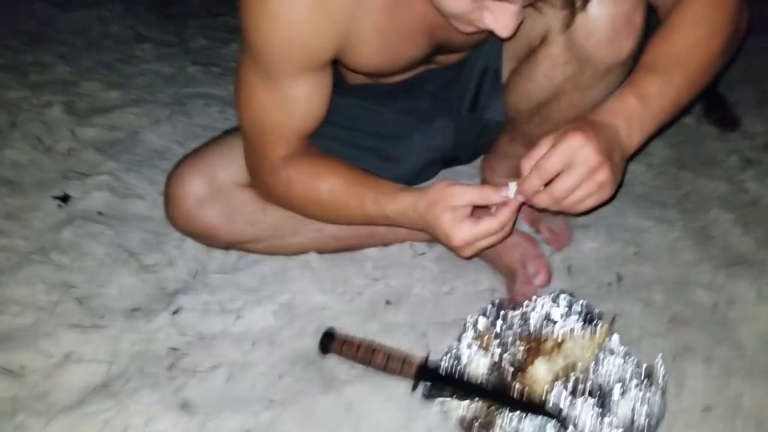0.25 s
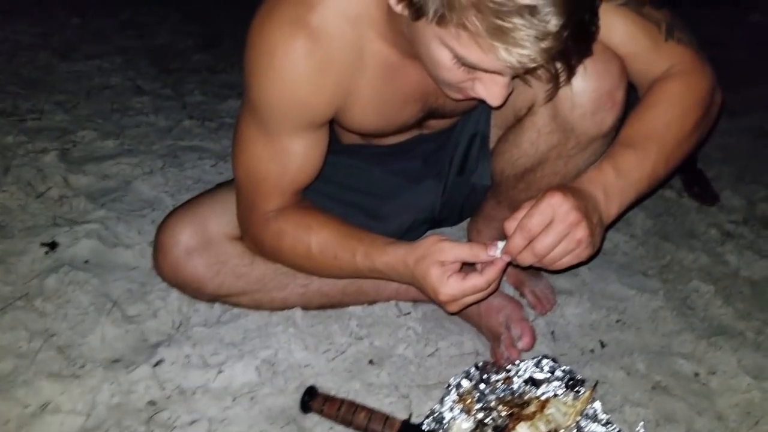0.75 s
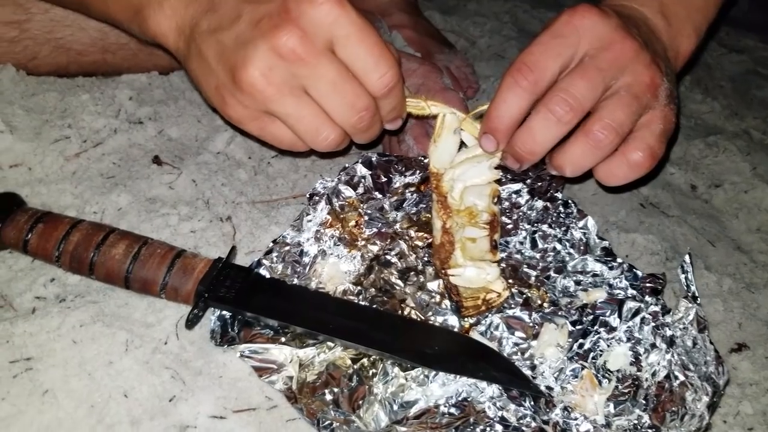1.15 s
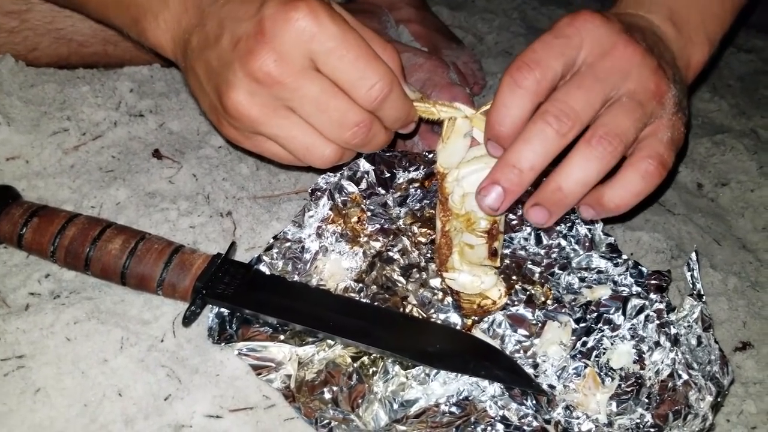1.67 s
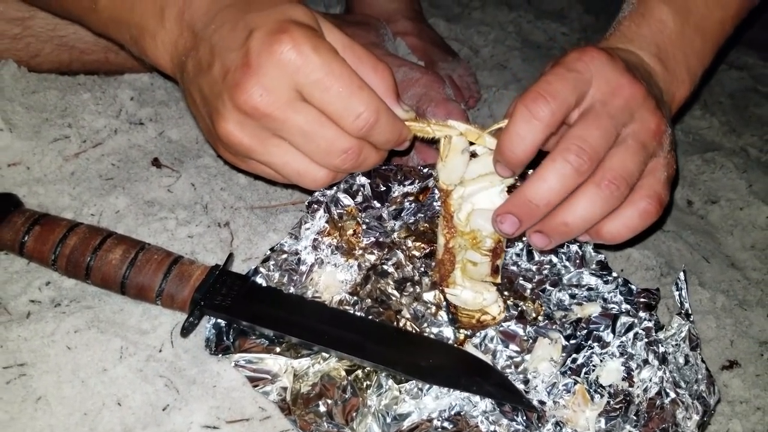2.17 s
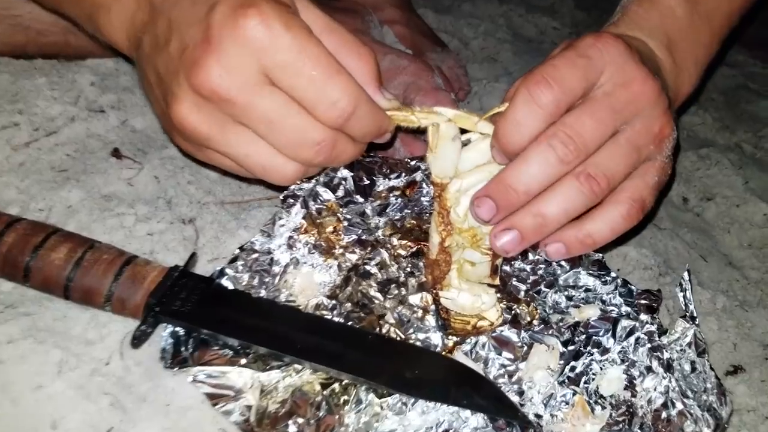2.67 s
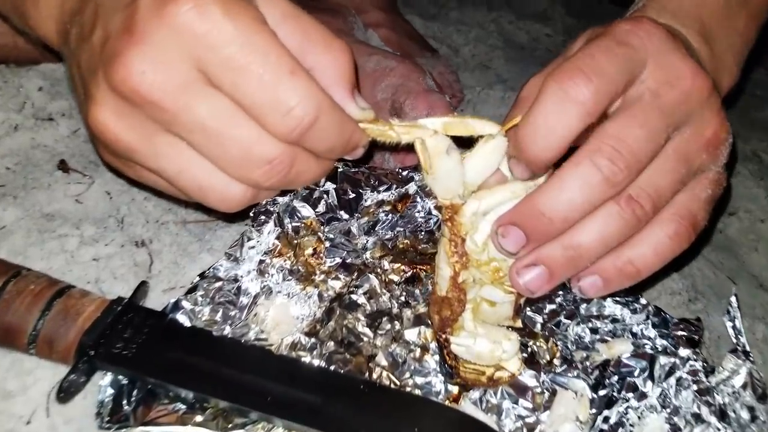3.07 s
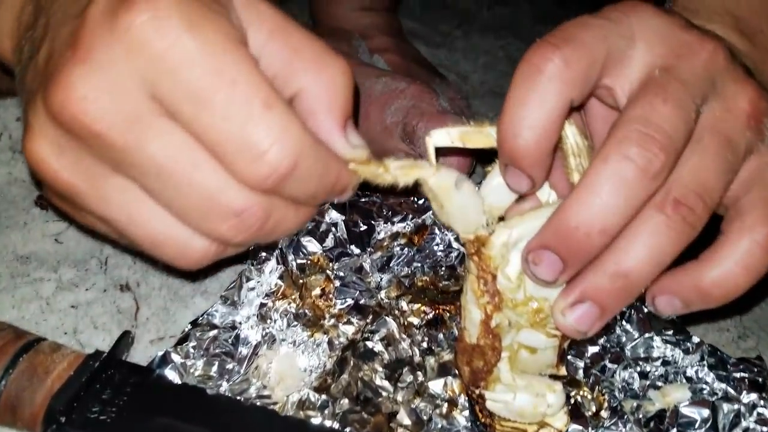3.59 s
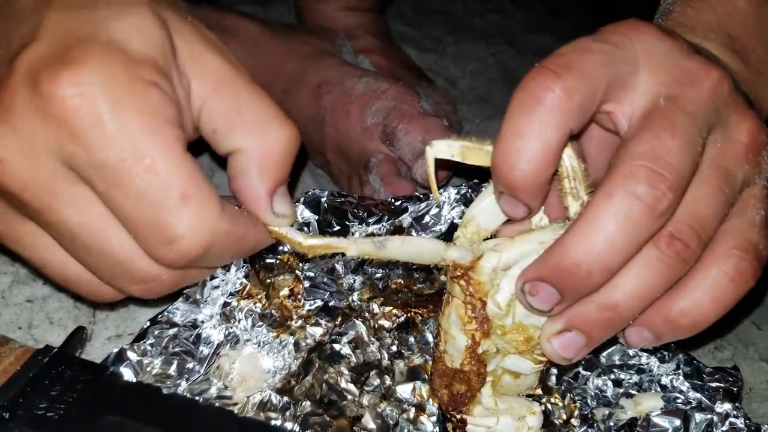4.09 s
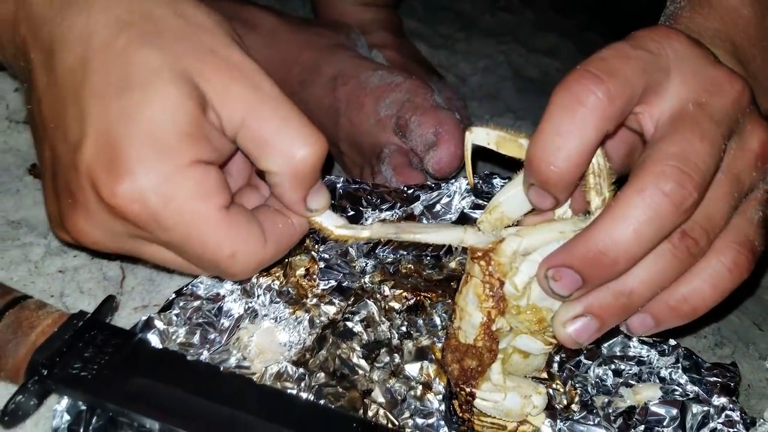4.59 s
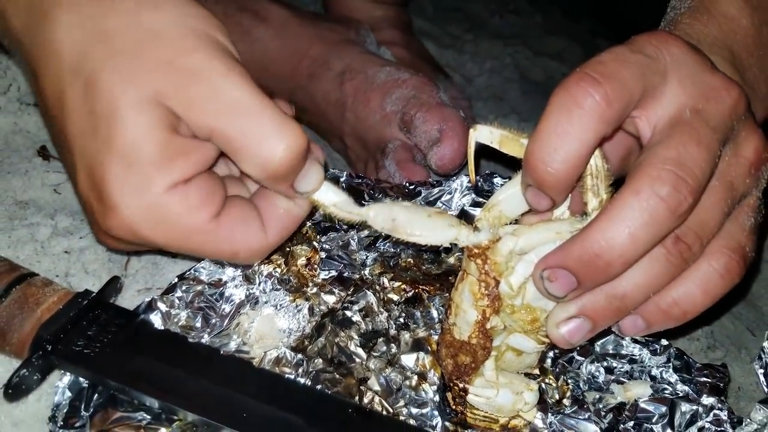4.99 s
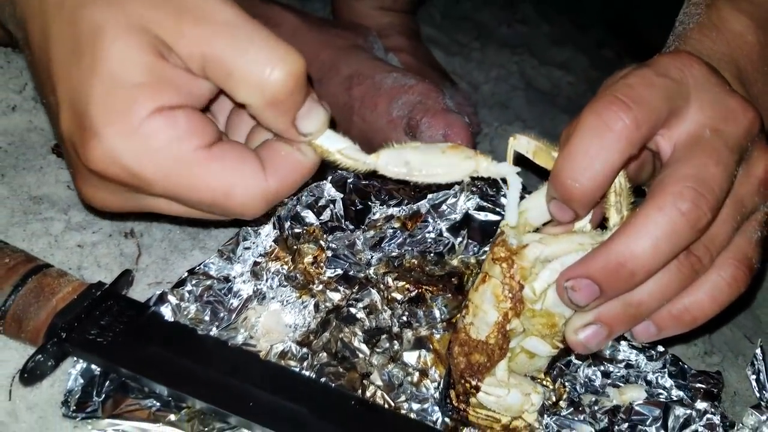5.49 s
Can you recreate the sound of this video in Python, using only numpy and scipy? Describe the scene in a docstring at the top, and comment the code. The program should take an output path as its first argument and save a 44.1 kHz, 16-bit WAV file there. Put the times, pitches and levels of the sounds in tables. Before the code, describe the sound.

Hands snap and pull apart a crab shell over crinkling foil, with faint insects, a soft breeze and distant surf behind.

```python
"""Sharp snaps and creaks of shell: hands crack a cooked crab and pull out a leg, on a beach at night.
Each break is a click with a splintery rattle, and a joint creaks as it slips in quick jerks.
Fingers rustle over crumpled aluminium foil, and juice pops in the squeezed meat.
Behind it a breeze bumps the left microphone, insects buzz and far surf rumbles."""
import sys
import numpy as np
from scipy import signal
from scipy.fft import rfft, irfft, next_fast_len
from scipy.io import wavfile
from scipy.ndimage import map_coordinates

SR = 44100
rng = np.random.default_rng(int(sys.argv[2]) if len(sys.argv) > 2 else 0)


def dump(signal):
    """Clip the signal to [-1, 1] and save it as 16-bit WAV at the path in sys.argv[1]."""
    limited = np.clip(np.atleast_2d(signal).T, -1, 1)
    pcm = np.round(limited * 32767).astype(np.int16)
    wavfile.write(sys.argv[1], SR, pcm)


N = 253388

# The notes at which the hollow shell rings: pitch_hz, width_hz, gain_db
SHELL_RINGS = [(770, 440, -4.5), (1920, 650, 1.5), (2600, 440, 2)]
# Each snap of shell and foil: start_s, thud_db, crack_db, tick_db (levels in all tables are relative)
SNAPS = [(1.021, -52, -43, -30.5), (1.0355, -48, -34.5, -32), (1.0745, -62, -40, -30.5),
         (1.1508, -80, -58, -30.5), (1.198, -65, -44, -39), (1.2629, -74, -40.5, -33.5),
         (1.3651, -41.5, -22, -20), (1.408, -54, -42, -35), (1.439, -72, -43, -32),
         (1.463, -76, -45.5, -28), (1.524, -69, -41, -57), (1.6144, -78, -56, -32),
         (1.738, -56, -35.5, -43), (2.088, -59, -46.5, -58), (2.1846, -66, -49, -39),
         (2.4646, -79, -67, -38), (2.77, -70, -41, -42), (2.852, -70, -44, -40), (2.8785, -67, -37.5, -32),
         (2.8919, -44.5, -34, -33), (2.8985, -49, -38, -29), (2.92, -67, -38, -44), (2.9352, -44, -38, -30),
         (2.941, -41, -26, -20.5), (2.9447, -46, -31.5, -31), (3.0447, -48, -39, -36),
         (3.0702, -51, -41, -31.5), (3.0916, -47.5, -39.5, -32.5), (3.107, -48, -43, -36),
         (3.1328, -66, -42, -39), (3.352, -75, -45, -30), (3.4453, -79, -41.5, -37.5),
         (3.4891, -43, -18.5, -14.5), (3.506, -67, -36, -23.5), (3.5804, -57, -36.5, -36),
         (3.605, -42.5, -28.5, -30), (3.646, -68, -50, -31.5), (3.671, -64, -35.5, -30.5),
         (3.7168, -60, -35, -49), (3.7303, -49.5, -32.5, -33), (3.761, -46.5, -31, -32.5),
         (3.786, -48, -32, -33), (3.829, -54, -36, -31.5), (3.8355, -54, -32, -26), (3.8663, -50, -36, -44),
         (3.8707, -20.5, -21, -17.5), (3.879, -37, -33, -28), (3.891, -41, -36, -21),
         (3.8995, -42, -34.5, -30), (3.917, -40, -31, -32), (3.9453, -56, -35, -29),
         (3.9518, -53, -26.5, -28), (3.9738, -39, -26.5, -24), (3.983, -45, -30, -36),
         (3.99, -32, -27, -18), (4.003, -43, -32, -43), (4.0602, -52, -30.5, -26), (4.066, -50, -35, -22),
         (4.088, -45, -39, -37), (4.1053, -57, -53, -48), (4.1233, -56, -61, -38), (4.298, -54, -44, -34),
         (4.3104, -45.5, -31, -36), (4.331, -53, -43.5, -41), (4.356, -58, -60, -40),
         (4.5625, -72, -48.5, -37), (4.8098, -50.5, -45.5, -50), (4.945, -71, -48, -43),
         (4.979, -79, -64, -40), (5.0075, -44, -32.5, -20.5), (5.108, -67, -40, -36),
         (5.1256, -56, -39, -26), (5.128, -55, -44, -26), (5.143, -36, -17.5, -13.5),
         (5.1589, -22.5, -45, -41), (5.173, -36, -28.5, -29), (5.1975, -37, -33, -25.5),
         (5.2099, -41, -31, -45), (5.4842, -71, -48, -59), (5.5387, -51.5, -40.5, -44),
         (5.685, -53, -37.5, -54)]


def snaps(fracture_kick=4.8, rattle_s=0.021, echo_s=0.0026, echo_db=-9.5):
    """A break clicks, then rattles: the hollow body thuds, the shell cracks and the foil ticks."""
    layers, t = np.zeros((3, 2, N + SR)), np.arange(SR // 20) / SR
    for start_s, thud_db, crack_db, tick_db in SNAPS:
        splinters = amp(5 * np.repeat(rng.standard_normal(len(t) // 30 + 1), 30)[:len(t)])
        fade_s = rattle_s * amp(2.2 * rng.standard_normal())  # time to fall by 60 dB
        click = amp(-60 * t / 0.0011)
        rattle = splinters * amp(-8 - 60 * t / fade_s)
        shared, own = rng.standard_normal(len(t)), rng.standard_normal((2, len(t)))
        shared[0] = fracture_kick  # the fracture itself is one hard step
        at = slice(round(start_s * SR), round(start_s * SR) + len(t))
        place_db = rng.normal(0, 2.5)
        levels_db = (thud_db + 24, crack_db + 19.5, tick_db + 19.5)
        # low sounds reach both microphones more alike; the left faces the hands and hears more treble
        for layer, db, alike, pan_db in zip(layers, levels_db, (1.6, .6, .1), (2.5, 1.5, 5)):
            burst = (click + rattle) * (alike * shared + own)
            burst /= np.linalg.norm(burst, axis=1, keepdims=True)
            layer[:, at] += amp(db) * pan_left(pan_db + place_db) * burst
    ground_echo = amp(echo_db) * np.roll(layers, round(echo_s * SR), axis=2)  # off the foil below
    thud, crack, tick = (layers + ground_echo)[..., :N]
    crack_ring = resonate(crack, [(5370, 167, -11), (7780, 133, -4.5)])
    crack = band(band(crack, 2800, 9550), 3260, 8360)
    tick = band(band(tick, 11500, 15100), 6100, 14600)
    return resonate(thud, SHELL_RINGS) + crack + crack_ring + tick


# Fingers dragging over foil and shell:
# start_s, length_s, level_db, low_offset_db, treble_offset_db, crackly_share (0 to 1)
FINGER_STROKES = [(1.008, 0.02, -53, -7, -2, 0.66), (1.07, 0.23, -76, -9, 8.5, 0.6),
                  (1.33, 0.19, -67.5, -8, 7, 0.7), (1.59, 0.17, -71.5, -7, 5.5, 1),
                  (1.917, 0.086, -70, -28, -3.5, 0.7), (2.13, 1, -90.5, -6, 13, 0.97),
                  (2.655, 0.14, -65.5, -13.5, 3, 0.85), (2.786, 0.21, -65.5, -12.5, 5, 0.94),
                  (2.941, 0.2, -63.5, -6, -2.5, 0.54), (3.152, 0.27, -73, -1, 3.5, 0.7),
                  (3.455, 0.33, -61.5, -14, 2, 0.9), (3.768, 0.25, -55, -13, 3.5, 1),
                  (3.915, 0.13, -59, -15, 2, 0.8), (4.022, 0.084, -59, -29, 0.5, 1),
                  (4.269, 0.084, -59, -20, -3, 1), (4.553, 0.043, -79.5, -22, 11, 1),
                  (4.665, 0.11, -59.5, -7.5, -0.5, 0.26), (4.829, 0.06, -58, -5, -1.5, 0.6),
                  (4.951, 0.11, -69.5, -24, 2, 1), (5.105, 0.092, -51, -15.5, -3, 0.74),
                  (5.483, 0.13, -72.5, -13, -1.5, 1), (5.639, .1, -65.5, -11.5, 0.5, 1)]


def finger_strokes(rise_s=0.034, fade_db_per_s=256):
    """Each drag rises, holds and fades. Gives its smooth and crackly power in low, middle and treble."""
    t, power = np.arange(N) / SR, np.zeros((2, 3, N))
    for start_s, length_s, db, low_db, treble_db, crackly_share in FINGER_STROKES:
        rise = np.clip((t - start_s) / rise_s, 0, 1)
        fade = amp(-fade_db_per_s * np.maximum(t - start_s - length_s, 0))
        gains = amp(db + np.array([[low_db], [0], [treble_db]]))
        power += np.reshape([1 - crackly_share, crackly_share], (2, 1, 1)) * (gains * rise * fade) ** 2
    return power


# The tone of rustling foil: pitch_hz, level_db
FOIL_TONE = [(1400, -10), (2000, -2), (4500, 0.5), (7400, -0.5), (9000, -11.5), (11000, -47)]
# The faint, even hush of the night: time_s, level_db, low_offset_db, treble_offset_db
NIGHT_HUSH = [(0, -76, 6.5, -6.5), (.75, -76, 7, -4.5), (1, -78, 0.5, -7.5), (2.3, -77, -3, -1.5),
              (3.3, -81, -2.5, -3), (4.5, -78.5, -7.5, 1), (5.75, -76.5, -11, -3.5)]


def foil_rustle():
    """Rubbed foil hisses and gives off tiny, uneven crinkles; between strokes only the hush is left."""
    ticks = rng.random(N) < 150 * amp(4 * wobble(20)) / SR
    sizes = amp(np.minimum(5 * rng.exponential(size=N), 14))
    fade = amp(-60 * np.arange(SR // 50) / SR / .007)
    crinkle = unit(signal.fftconvolve(ticks * sizes, fade)[:N])
    smooth, crackly = finger_strokes()
    smooth *= amp(1.6 * np.array([wobble(45) for _ in range(3)]))  # the rub catches unevenly
    hush_db, low_db, treble_db = curves(NIGHT_HUSH)
    hush = amp(hush_db + np.array([low_db, np.zeros(N), treble_db]))
    grain = [unit(steady + crinkle) for steady in (3, 1.1, .45)]  # the treble crackles most
    low, mid, high = np.sqrt(hush ** 2 + smooth + crackly * np.square(grain))
    low_tone = [(300, 1.5), (600, 0), (1200, -2), (2000, -11), (3000, -38)]
    high_tone = [(8000, -25), (9500, -2.5), (13000, 1), (15600, 3), (16100, -34), (17000, -55)]
    low = low * noise(low_tone, [(1000, 0.31)])
    mid = mid * noise(FOIL_TONE, [(2400, 0.27), (5000, 0.087)]) * pan_left(1)
    high = high * noise(high_tone, [(9000, 0.021)]) * pan_left(1.3)
    return amp(6) * (low + mid + high)


# The leg joint slipping, one list for each creak: time_s, slips_per_s, level_db
CREAKS = [
    [(.577, 139, -48), (.584, 620, -45.5), (.6, 460, -40.5), (.622, 530, -41.5), (.633, 200, -40),
     (.638, 590, -43.5), (.648, 296, -45), (.661, 100, -39)],
    [(.733, 114, -48.5), (.7455, 290, -44), (.76, 410, -69)],
]
# The notes at which the joint rings: pitch_hz, width_hz, gain_db
JOINT_RINGS = [(1260, 1300, -18.5), (3260, 490, -2), (4740, 480, 4.5), (5380, 300, -13)]


def joint_creak():
    """Each slip is a rough kick that makes the joint ring, with a thin scratch on top."""
    kicks, t = np.zeros(N), np.arange(N) / SR
    for rows in CREAKS:
        slips_per_s, level_db = curves(rows)
        creaking = (t >= rows[0][0]) & (t <= rows[-1][0])
        uneven_rate = slips_per_s * creaking * amp(2.1 * wobble(300))
        slips = np.diff(np.floor(np.cumsum(uneven_rate) / SR + .8), prepend=0)
        kicks += slips * amp(level_db + rng.standard_normal(N))
    fade = amp(-60 * np.arange(SR // 100) / SR / 0.0078)
    rough = signal.fftconvolve(kicks, fade)[:N] * rng.standard_normal((2, N))
    ring = band(resonate(kicks + 0.5 * rough, JOINT_RINGS), 1060, 4670)
    scratch = band(band(rough, 10000, 15000), 11900, 15600)
    return (amp(27) * ring + amp(-3) * scratch) * pan_left(4.6)


# Pockets of juice popping in the squeezed meat: start_s, level_db, pitch_hz
JUICE_POPS = [(3.224, -60.5, 1100), (3.246, -62, 940), (3.282, -52, 970), (3.299, -57.5, 1020),
              (3.314, -54, 710), (3.352, -60, 1130), (3.405, -57, 566), (3.462, -55, 584),
              (3.472, -56.5, 625), (3.556, -60.5, 465), (3.577, -56, 625), (5.222, -51, 766)]


def meat_squelch(small_pops=8):
    """Each pocket of juice rings for a few cycles as it pops, with smaller pops scattered around it."""
    pops, t = np.zeros(N + SR), np.arange(SR // 40) / SR
    for start_s, db, hz in JUICE_POPS:
        small = [(start_s + .016 * delay, db - 6.5 + 2.2 * size, hz * amp(2 * detune))
                 for delay, size, detune in rng.standard_normal((small_pops, 3))]
        for at_s, level_db, pitch_hz in [(start_s, db, hz)] + small:
            cycles = pitch_hz * t
            swell = cycles * np.exp(1 - cycles / 1.2)
            pops[round(at_s * SR):][:len(t)] += amp(level_db) * swell * np.sin(2 * np.pi * cycles)
    return band(pops[:N], 280, 1400) * pan_left(4)


# Single pushes of air on the left microphone: time_s, level_db, pitch_hz, width_cycles
AIR_BUMPS = [(0.049, -33, 100, 0.29), (0.064, -28, 74.6, 0.7), (0.087, -28.5, 117, 0.6),
             (0.206, -25, 68, 0.6), (0.223, -29, 99, 0.65), (0.311, -34.5, 80.5, 0.61),
             (0.342, -36, 74, 0.54), (0.548, -39, 79, 0.68), (1.031, -33, 59.3, 0.53),
             (1.069, -27.5, 118, 0.87), (1.099, -25, 65.5, 1), (1.174, -18, 73.4, 0.16),
             (1.381, -30.5, 85, 0.42), (1.491, -42.5, 91.5, 0.87), (1.573, -27.5, 87.5, 0.6)]
# The tone of the wind's rumble: pitch_hz, level_db
WIND_TONE = [(15, -8), (45, 5.5), (80, 11), (150, -7), (300, -42), (600, -74)]
# How the wind and the surf die down: time_s, wind_db, surf_db
WIND_AND_SURF = [(0, -49, -57.5), (.5, -57.5, -64), (.95, -60, -62), (1.3, -59.5, -64.5), (2.0, -60.5, -65),
                 (2.7, -66, -65), (4, -70.5, -66), (5.75, -82, -67)]


def breeze():
    """Lumpy wind and single pushes of air hit the left microphone; the right one is sheltered."""
    wind_db, _ = curves(WIND_AND_SURF)
    lumps = unit(amp(2.3 * wobble(8.2)) * noise(WIND_TONE, [(30, 0.11)]))
    pushes, t = np.zeros(N), np.arange(N) / SR
    for time_s, db, pitch_hz, width_cycles in AIR_BUMPS:
        cycles = pitch_hz * (t - time_s)
        swell = np.exp(-(cycles / width_cycles) ** 2)
        pushes -= amp(db) * swell * np.cos(2 * np.pi * cycles + rng.uniform(-0.093, 0.47))
    return lumps * amp(wind_db) * amp([[3], [-8]]) + pushes * [[1], [0]]


# The tone of the far waves: pitch_hz, level_db
SURF_TONE = [(24, -42), (40, -2.5), (151, -1), (281, -12), (377, -12), (626, -22.5), (1560, -37),
             (2000, -35), (2600, -49)]
# How alike the waves sound on the left and right: pitch_hz, likeness
SURF_LIKENESS = [(60, 1), (200, 0.94), (700, 0.28), (1290, -1.6)]


def surf():
    """Far waves rumble, with nearly the same bass at both microphones."""
    _, surf_db = curves(WIND_AND_SURF)
    return amp(surf_db + 6 + 1.2 * wobble(11)) * noise(SURF_TONE, SURF_LIKENESS) * pan_left(1.9)


# The insect chorus: time_s, level_db, lean_db (more lean favours the higher singers)
CHORUS = [(0, -58, -2.5), (1, -61.5, -5), (1.9, -64.5, -4), (2.14, -60.5, -5.5), (2.42, -59.5, 11),
          (2.6, -63.5, -9.5), (3.2, -60, 1), (4.3, -63, -0.5), (5.75, -62, 6)]
# The narrow tone of their wings: pitch_hz, level_db
WING_TONE = [(3410, -66), (5800, -11), (6500, 7.5), (7030, 15.5), (7250, 26.5), (7450, 19), (7700, -4),
             (8300, -59)]


def insects(wing_strokes_per_s=88):
    """Two groups of insects, one a little higher, buzz with a flutter at the rate of their wing strokes."""
    level_db, lean_db = curves(CHORUS)
    flutter = np.sin(2 * np.pi * np.cumsum(wing_strokes_per_s + 3 * wobble(31)) / SR)
    chorus = np.zeros((2, N))
    # lower and higher singers swell in turn, so the pitch seems to waver
    for pitch_ratio, lean_weight in ((.975, -1.35), (1.025, 0.53)):
        tone = [(hz * pitch_ratio, db) for hz, db in WING_TONE]
        swell = amp(lean_weight * lean_db / 2 + 0.67 * wobble(4.13))
        chorus += swell * noise(tone, [(7000, 0.03)])
    return amp(level_db + 2.1 * flutter) * unit(chorus) * pan_left(9.7)


def amp(db):
    """Turn decibels into a gain to multiply by."""
    return 10 ** (np.asarray(db) / 20)


def unit(x):
    """Scale a sound to an average power of 1."""
    return x / np.sqrt(np.mean(x ** 2) + 1e-20)


def pan_left(db):
    """Left and right gains that make the left side louder by db."""
    return amp([[db / 2], [-db / 2]])


def at_pitch(points, hz):
    """Read between (pitch_hz, value) points, giving each octave equal room."""
    pitches, values = np.transpose(points)
    return np.interp(np.log(hz + 1), np.log(pitches + 1), values)


def curves(rows):
    """Join timed rows with straight lines: one curve for each column after time_s."""
    times, *columns = np.transpose(rows)
    return [np.interp(np.arange(N) / SR, times, column) for column in columns]


def wobble(per_s):
    """A smooth curve through per_s random values a second."""
    return map_coordinates(rng.standard_normal(int(N * per_s / SR) + 4), [np.arange(N) * per_s / SR])


def filtered(x, response):
    """Multiply each frequency in a sound by response(hz)."""
    size = next_fast_len(N + SR // 2)
    return irfft(rfft(x, size) * response(np.fft.rfftfreq(size, 1 / SR)), size)[..., :N]


def band(x, low_hz, high_hz):
    """Keep the sound between two frequencies, fading away outside them."""
    return signal.sosfilt(signal.butter(2, [low_hz, high_hz], "band", fs=SR, output="sos"), x)


def resonate(x, rings):
    """Make a sound ring at a few (pitch_hz, width_hz, gain_db) notes."""
    def response(hz):
        return sum((-1) ** k * amp(db) * 1j * hz * width / (pitch ** 2 - hz ** 2 + 1j * hz * width)
                   for k, (pitch, width, db) in enumerate(rings))
    return filtered(x, response)


def noise(tone, likeness):
    """Stereo noise with a given tone; likeness 1 makes both sides the same, -1 or less opposite."""
    def response(hz):
        spread = np.arccos(np.clip(at_pitch(likeness, hz), -1, 1)) / 2
        return amp(at_pitch(tone, hz)) * [np.cos(spread), np.sin(spread)]
    mid, side = filtered(rng.standard_normal((2, N)), response)
    return unit(np.array([mid + side, mid - side]))


def scene():
    """The crab and foil close by, with the night beach behind them."""
    return snaps() + foil_rustle() + joint_creak() + meat_squelch() + breeze() + surf() + insects()


# The tone of the microphones' own hiss: pitch_hz, level_db
HISS_TONE = [(300, -11), (1500, 9), (5000, -3), (7500, -9), (8600, -49), (11000, 12), (15000, 23),
             (15800, 13), (16100, -13)]
TOP_HZ = 16984


def record(dry):
    """The microphones add a faint hiss, and nothing above TOP_HZ gets through."""
    hiss = amp(-79.5) * noise(HISS_TONE, [(1000, 0)])
    return filtered(dry + hiss, lambda hz: hz < TOP_HZ)


dry = scene()
out = record(dry)
dump(out)
```